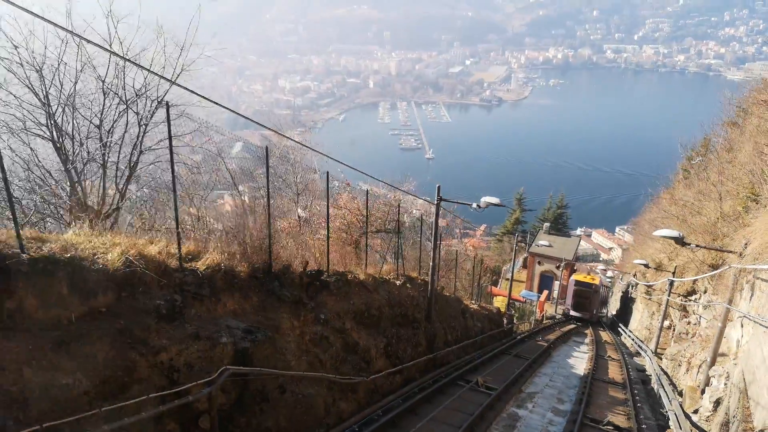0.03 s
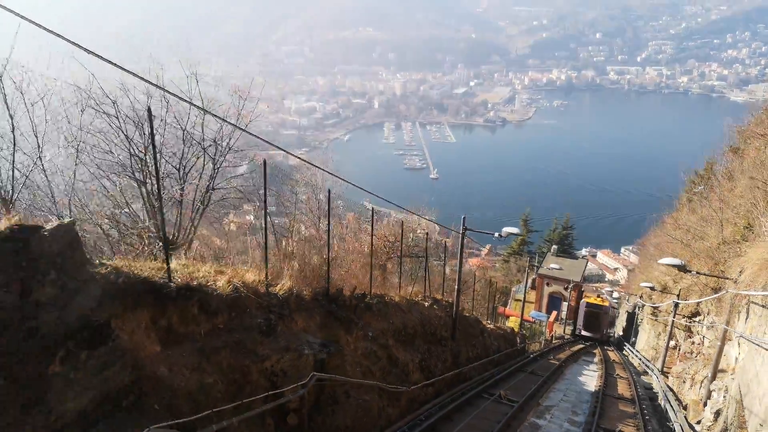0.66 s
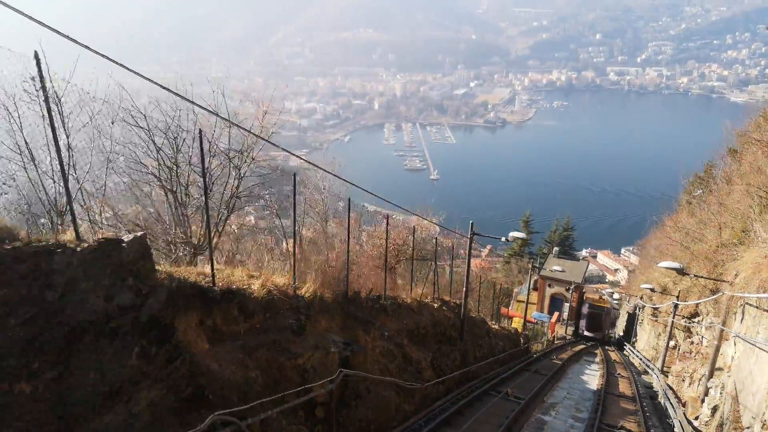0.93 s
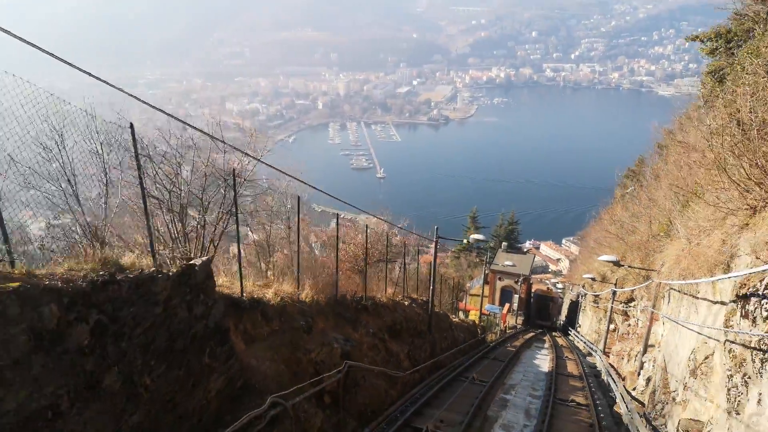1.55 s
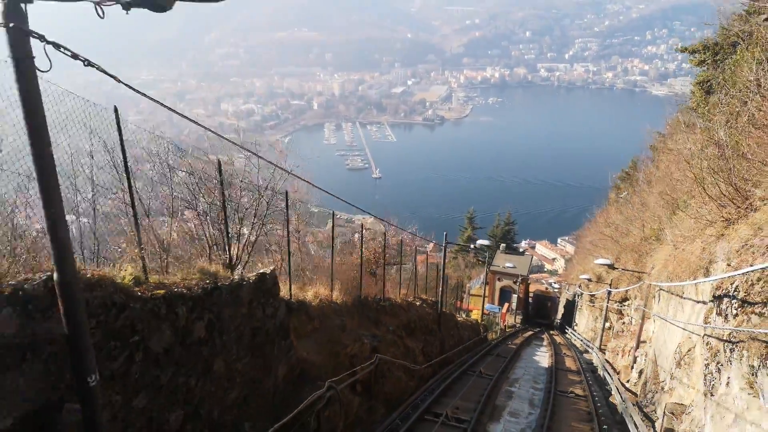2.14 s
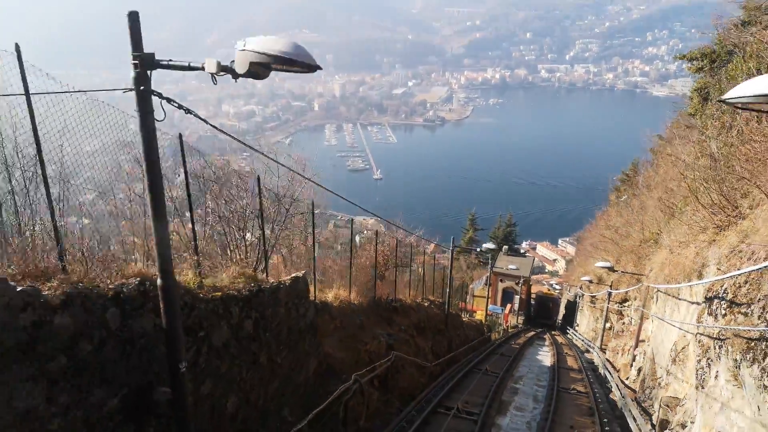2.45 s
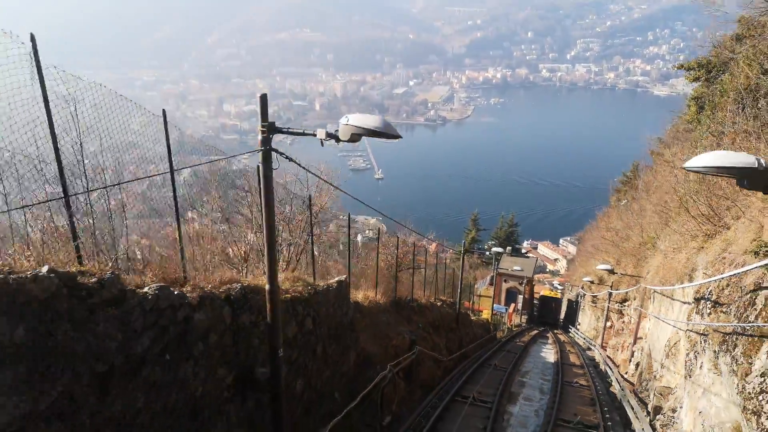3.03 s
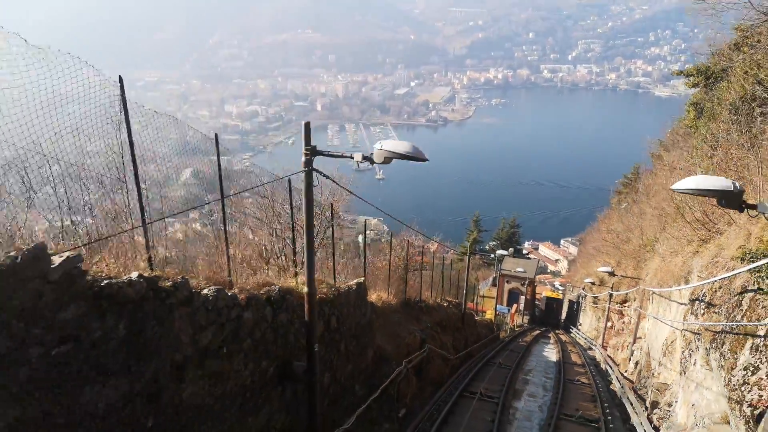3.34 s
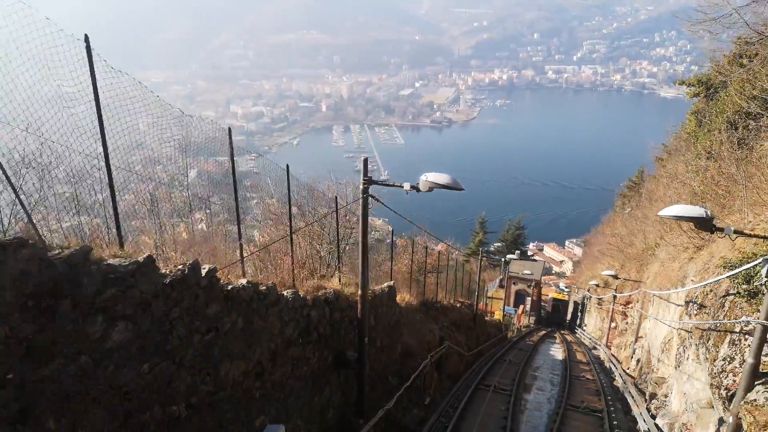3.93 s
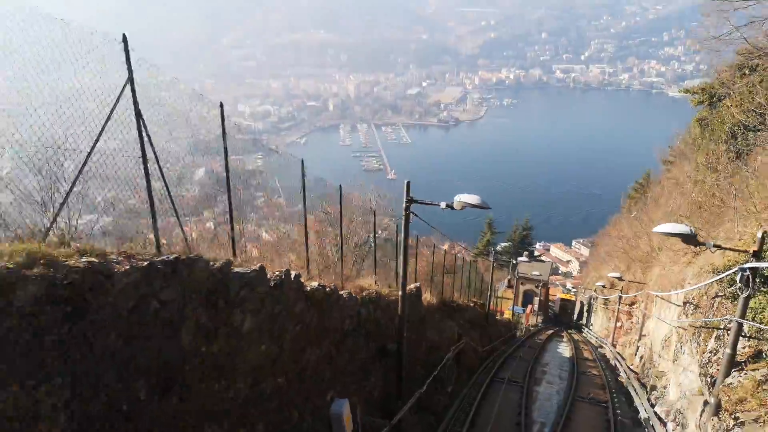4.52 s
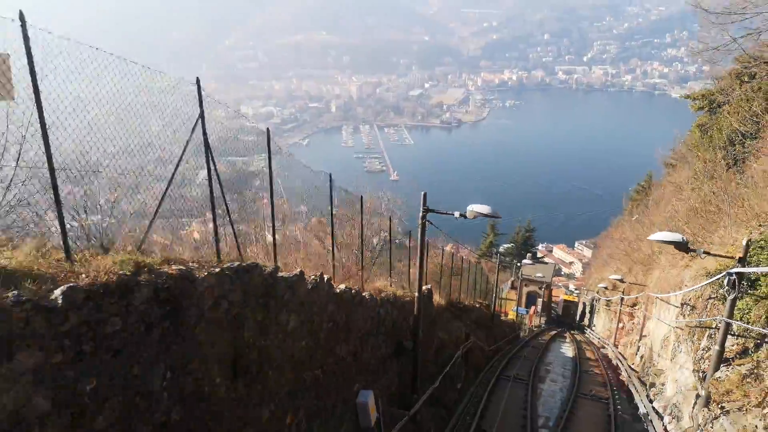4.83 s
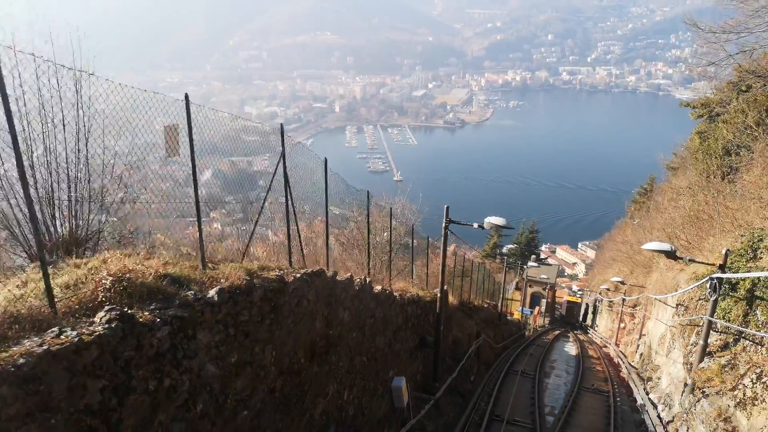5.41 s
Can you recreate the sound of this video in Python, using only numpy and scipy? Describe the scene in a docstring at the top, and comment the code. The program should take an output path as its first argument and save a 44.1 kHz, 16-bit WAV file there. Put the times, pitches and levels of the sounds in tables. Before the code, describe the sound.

A funicular car rolls along its track for about five and a half seconds, heard from its open end. A deep, pulsing cabin rumble dominates throughout, slightly to the left, over a dull wheel roar and faint gusts of hissing air. Soft knocks come at 0.3 seconds and cluster between 0.8 and 1, with a tiny tick at 0.5 and a brief spit and scrape around 0.7. Dull bumps jolt the cabin between 1.8 and 2.5 seconds, the heaviest at 2.3 with a muffled crunch. The rumble and gusts are strongest from about 2 to 4.7 seconds. A low wheel hum swells around 3.2, with a barely audible high air whistle. A knock and tick land at 3.6, another thump at 4.1, and light knocks from 4.8 to 5.3 as the rumble eases. A faint, thin rail squeal comes at 5.5.

```python
"""A funicular car climbs a steep track, heard from its open end.
From the start the rolling wheels keep the cabin booming in four low modes, over a dull roar and gusts
of hissing air. Soft knocks begin; a tick, a spit and a scrape pass in the first second. Then bumps jolt
the cabin, the heaviest with a dull crunch, air whistles faintly and a singing wheel swells, while a
limiter holds down the biggest booms. A thin rail squeal comes at the very end."""
import sys
import numpy as np
from scipy import signal
from scipy.fft import rfft, irfft, next_fast_len
from scipy.io import wavfile
from scipy.ndimage import uniform_filter1d, minimum_filter1d

SR = 44100
rng = np.random.default_rng(int(sys.argv[2]) if len(sys.argv) > 2 else 0)


def wav_out(sig):
    """Save sig, one row per channel (or a flat mono array), as 16-bit PCM at SR to the path in sys.argv[1]."""
    wavfile.write(sys.argv[1], SR, np.round(np.clip(np.atleast_2d(sig).T, -1, 1) * 32767).astype(np.int16))


N = 246078
T = np.arange(N) / SR


def from_db(db):
    """Decibels to gain."""
    return 10 ** (np.asarray(db) / 20)


def unit_rms(x):
    """Scale to unit power."""
    return x / np.sqrt(np.mean(np.abs(x) ** 2) + 1e-20)


def curves(rows):
    """Each column of a timed table, at every sample."""
    s, *columns = np.transpose(rows)
    return [np.interp(T, s, column) for column in columns]


def pan(left_db):
    """Left and right gains for a level difference."""
    return from_db(np.array([[left_db], [-left_db]]) / 2)


def drift(rate_hz):
    """A smooth random wander, mostly slower than rate_hz; rms 1."""
    size = next_fast_len(N // 20)
    hz = np.fft.rfftfreq(size, 20 / SR)
    slow = irfft(rfft(rng.standard_normal(size)) / (1 + (hz / rate_hz) ** 4), size)
    return unit_rms(np.interp(np.arange(N) / 20, np.arange(size), slow))


def coloured(spectrum):
    """Noise with the given spectrum, rippled by reflections from the cabin walls; rms 1."""
    size = next_fast_len(N)
    hz, db = np.transpose(spectrum)
    bins = np.maximum(np.fft.rfftfreq(size, 1 / SR), 1)
    skirts = np.minimum(bins / hz[0], 1) ** 2 * np.minimum(hz[-1] / bins, 1) ** 2
    gain = from_db(np.interp(np.log(bins), np.log(hz), db)) * skirts
    direct = irfft(rfft(rng.standard_normal(size)) * gain, size)[:N]
    lags = (rng.uniform(.004, .022, size=4) * SR).astype(int)
    return unit_rms(direct + from_db(-15) * sum(np.roll(direct, lag) for lag in lags))


def stereo(spectrum, side_db):
    """Coloured noise, partly different at the two ears."""
    return coloured(spectrum) + from_db(side_db) * coloured(spectrum) * np.array([[1], [-1]])


def phasor(hz):
    """A unit phasor that follows a pitch curve."""
    return np.exp(2j * np.pi * np.cumsum(hz) / SR)


def tone(hz, waver):
    """A sine whose pitch wanders by the fraction waver; rms 1."""
    return unit_rms(np.imag(phasor(hz * (1 + waver * drift(22)))))


def swell(s, length, steepness):
    """A smooth rise and fall around s, above half power for the given length; steepness 2 is a bell."""
    near, out = slice(*np.searchsorted(T, [s - 2 * length, s + 2 * length])), np.zeros(N)
    out[near] = 2 ** (-np.abs(2 * (T[near] - s) / length) ** steepness / 2)
    return out


def burst(s, rise, t60):
    """Envelope of one blow: a quick rise, then an exponential decay."""
    near = (T >= s) & (T < s + 2 * t60)
    age, out = T[near] - s, np.zeros(N)
    out[near] = (1 - np.exp(-age / rise)) * from_db(-60 * age / t60)
    return out


def ringing(modes):
    """Resonances kept ringing by random excitation; rms 1."""
    out = 0
    for hz, width, db in modes:
        radius = np.exp(-np.pi * width / SR)
        poles = [1, -2 * radius * np.cos(2 * np.pi * hz / SR), radius * radius]
        out = out + from_db(db) * unit_rms(signal.lfilter([1, 0, -1], poles, rng.standard_normal(N)))
    return unit_rms(out)


def struck(s, modes, rise):
    """One blow on a body: every mode rings down at its own rate, with a strength of its own."""
    near = (T >= s) & (T < s + 1 / 4)
    age, out = T[near] - s, np.zeros(N)
    for k, (hz, db, t60) in enumerate(modes):
        strength = (-1) ** k * from_db(db + rng.normal(0, 1))
        envelope = (1 - np.exp(-age / rise)) * from_db(-60 * age / t60)
        out[near] += strength * envelope * np.sin(2 * np.pi * hz * age)
    return out


# The cabin's low end. Each row: centre in Hz, width in Hz, level on an average ride in dB,
# dB gained per dB of shaking, judder in dB, lean to the left in dB.
BOOM_MODES = [(34.48, 6.4, -18.5, 0.03, 0, 1.7), (59.56, 3.85, -19, 1.2, -1.5, 2.2),
              (79.4, 9.3, -18, 0.22, -2, 1.3), (119.2, 4.73, -19, 0.68, -2, 2)]
# Pushes from the wheels. Each row: middle in seconds, length in seconds, pitch in Hz, level in dB.
SURGES = [(0.133, 0.066, 33.6, -13.5), (0.685, 0.061, 57.4, -12), (0.74, 0.082, 81.7, -11.5),
          (1.004, 0.083, 84.2, -12.5), (1.165, 0.18, 35.1, -12.5), (1.292, 0.67, 60.98, -16),
          (1.311, 0.037, 118.3, -14.5), (1.547, 0.11, 74.84, -11), (1.604, 0.082, 117.4, -10),
          (1.78, 0.06, 80.9, -9), (1.866, 0.088, 109.6, -12.5), (2.038, 0.2, 80.02, -7.5),
          (2.084, .24, 56.83, -10), (2.214, 0.2, 33.14, -17), (2.33, 0.069, 115.9, -12.5),
          (2.411, 0.26, 83.1, -8.5), (2.46, 0.2, 58.59, -21), (2.514, 0.21, 119.9, -15),
          (2.707, 0.064, 123.8, -5), (2.71, 0.078, 78.05, -5), (2.895, 0.061, 82.33, -8.5),
          (3.046, 0.17, 57.23, -8), (3.223, 0.225, 106.3, -10), (3.426, .17, 57.04, -8.5),
          (3.558, 0.1534, 76.76, -5.5), (4.149, 0.22, 122.2, -6), (4.003, 0.071, 75.03, -11),
          (4.272, 0.21, 76.74, -10), (4.34, 0.036, 122.2, -13), (4.42, 0.17, 56.96, -12.5),
          (4.595, 0.15, 58.8, -11), (4.613, 0.05, 117.4, -13.5), (4.869, .15, 73.3, -16),
          (5.066, 0.042, 118.4, -12.5), (5.297, .1, 78.3, -15.5)]


def surging(hz, db):
    """Pitch and level of a cabin mode: each surge near it lifts its level and pulls its pitch."""
    centres = np.array(BOOM_MODES)[:, 0]
    power = from_db(db) ** 2
    pull = power * hz
    for s, length, surge_hz, surge_db in SURGES:
        if np.argmin(np.abs(centres - surge_hz)) == np.argmin(np.abs(centres - hz)):
            push = (from_db(surge_db) * swell(s, length, steepness=2.81)) ** 2
            power, pull = power + push, pull + push * surge_hz
    return pull / power, 10 * np.log10(power)


def boom(hz, db, width_hz, judder_db):
    """A cabin mode driven at random by the wheels: a ring of wandering phase, roughened by judder."""
    ring = drift(width_hz) + 1j * drift(width_hz)
    ring = ring / np.sqrt(np.abs(ring) ** 2 + 0.45)
    judder = drift(12.7) + 1j * drift(12.3)
    judder = judder / np.sqrt(uniform_filter1d(np.abs(judder) ** 2, SR // 6))
    share = from_db(judder_db - 0.85 * (db - db.mean()))   # the stronger the boom, the purer it is
    shake = (ring + share * judder) / np.sqrt(1 + share ** 2)
    return from_db(db) * unit_rms(np.real(shake * phasor(hz)))


# How hard the track shakes the car. Each row: time in seconds, drone fader in dB, roar fader in dB.
RIDE = [(0.03, -43.5, -44.5), (0.07, -34, -46.5), (0.75, -32, -45.5), (0.87, -25.5, -47),
        (0.89, -25.5, -46), (1.18, -34.5, -45.5), (1.23, -27.5, -43), (3.34, -26, -39), (3.81, -27.5, -46),
        (3.97, -33.5, -45), (4.07, -24, -40.5), (4.24, -24, -35.5), (4.54, -28, -41), (4.82, -29, -39.5),
        (4.96, -34.5, -45.5), (5.32, -31, -47), (5.35, -38, -48.5), (5.54, -29.5, -46.5)]
# Brief dips in the booming. Each row: middle in seconds, length in seconds, gain in dB.
LULLS = [(1.716, 0.08, -2.5), (2.25, 0.031, -3.5), (2.768, .04, -3), (3.882, 0.13, -2),
         (5.195, 0.044, -5.5)]


def cabin_booms():
    """Four low modes ride the shaking of the car, surge and briefly dip."""
    drone_db = curves(RIDE)[0]
    shaking_db = drone_db - drone_db.mean()
    booms = sum(boom(*surging(hz, db + follows * shaking_db), width_hz, judder_db) * pan(left_db)
                for hz, width_hz, db, follows, judder_db, left_db in BOOM_MODES)
    lull_db = sum(db * swell(s, length, steepness=2.5) for s, length, db in LULLS)
    return from_db(lull_db) * booms


# The drone's low-mid colour. Each row: frequency in Hz, relative level in dB.
PANEL_COLOUR = [(125, -44), (148, 9), (170, 8.5), (200, 3), (222, 5), (240, -6.5), (290, -4), (320, -19.5),
                (420, -16.5), (700, -81)]


def panel_drone():
    """The wall panels drone as the track shakes them."""
    drone_db = curves(RIDE)[0]
    return from_db(drone_db + 0.9) * stereo(PANEL_COLOUR, side_db=-12) * pan(4.3)


def singing_wheel():
    """A wheel sings throughout and swells for a while."""
    level_db = -41.5 + 8.5 * swell(s=3.24, length=.8, steepness=3.1)
    return from_db(level_db) * tone(hz=225.3, waver=0.0249) * pan(4.3)


# The roar's dark colour. Each row: frequency in Hz, relative level in dB.
ROAR_COLOUR = [(200, -12), (320, 3.5), (420, -4), (560, -4.5), (800, -7), (1050, -15), (1400, -18.5),
               (1800, -21.5), (3500, -48)]
# The ring of the rails. Each row: pitch in Hz, width in Hz, relative level in dB.
RAIL_MODES = [(1192, 21, -8), (1386, 140, 0), (2370, 25, -13.5), (3170, 47, -7), (3600, 50, -7.5),
              (4330, 49.6, -14)]


def wheel_roar():
    """Steel rolling on uneven rail: a dull roar that flutters and a faint metallic ring."""
    roar_db = curves(RIDE)[1]
    flutter_db = 0.55 * drift(17)
    roar = from_db(roar_db - 0.25 + flutter_db) * stereo(ROAR_COLOUR, side_db=-3.5) * pan(0.32)
    ring = from_db(roar_db - 10.5) * np.array([ringing(RAIL_MODES), ringing(RAIL_MODES)])
    return roar + ring


# The bed of air. Each row: time in seconds, rush fader in dB, hiss fader in dB.
AIR_BED = [(0, -55.5, -52), (0.58, -58, -56), (0.9, -53, -48), (1.65, -50.5, -50), (3.6, -53.5, -45.5),
           (3.87, -55.5, -53), (4.45, -53.5, -46), (5.22, -65.5, -57), (5.55, -53, -50)]
# Gusts on top. Each row: middle in seconds, length in seconds, rush in dB, hiss in dB.
GUSTS = [(0.407, 0.092, -59, -55.5), (0.69, 0.058, -54, -44.5), (0.77, 0.044, -59, -46),
         (1.153, 0.08, -53, -45), (1.381, 0.088, -49, -49.5), (1.963, .13, -69, -49.5),
         (2.137, 0.061, -52, -45), (2.527, 0.22, -47, -40.5), (2.708, 0.14, -44.5, -42.5),
         (3.123, 0.084, -58, -41.5), (3.274, 0.16, -46, -45.5), (3.479, 0.093, -49.5, -38),
         (3.582, 0.09, -48, -42.5), (4.229, 0.13, -43.5, -40.5), (4.359, 0.1, -54, -42.5),
         (4.549, 0.064, -55, -39.5), (4.65, 0.059, -48.5, -39.5), (4.77, 0.12, -51.5, -43),
         (5.128, 0.072, -56, -52.5), (5.321, 0.049, -73, -55)]
# Colours of the midrange rush and each side's hiss. Each row: frequency in Hz, relative level in dB.
RUSH_COLOUR = [(500, -7), (1100, 7.5), (1500, 1), (1900, 0.5), (2500, 1.5), (3200, -4), (4200, -13.5),
               (5500, -5.5), (9000, -16)]
HISS_LEFT = [(2500, -14.5), (4500, -13.5), (5800, -12.5), (7400, -10.5), (8500, -6.5), (9450, -2),
             (10600, -10.5), (12200, -16.5), (14300, -21.5)]
HISS_RIGHT = [(2500, -31), (4200, -8), (4800, -22), (6000, -14), (7600, -11.5), (8750, -5), (9900, -15),
              (11500, -24.5), (14300, -28)]


def airflow():
    """Gusts rush past; each microphone port colours the hiss with its own resonance."""
    rush_power, hiss_power = from_db(curves(AIR_BED)) ** 2
    for s, length, rush_db, hiss_db in GUSTS:
        gust = swell(s, length, steepness=1.87) ** 2
        rush_power = rush_power + gust * from_db(rush_db) ** 2
        hiss_power = hiss_power + gust * from_db(hiss_db) ** 2
    eddies = from_db(0.93 * drift(14.5))
    rush = np.sqrt(rush_power) * from_db(1.2) * stereo(RUSH_COLOUR, side_db=0.6)
    ports = np.array([coloured(HISS_LEFT), coloured(HISS_RIGHT)])
    hiss = np.sqrt(hiss_power) * from_db(0.67) * ports * pan(4.6)
    return eddies * (rush + hiss)


# Knocks, and the dull crunch on the heaviest thumps.
# Each row: start in seconds, level in dB, brightness in dB.
KNOCKS = [(0.305, -36, -3.5), (0.756, -33, -4), (0.814, -40.5, -4), (0.89, -29.5, -2.5), (0.955, -35, -15),
          (1.004, -34, -7.5), (1.77, -36, -18), (1.96, -38, -6), (2.314, -30.5, -10), (2.53, -35, -24),
          (3.557, -31.5, -3.5), (4.119, -36, -23), (4.226, -29.5, -12), (4.828, -33.5, 4.5),
          (5.101, -31.5, 1), (5.298, -37.5, -6)]
# The clack of the attack. Each row: pitch in Hz, relative level in dB, seconds to fall 60 dB.
CLACK_MODES = [(636, -9.5, 0.11), (867, 2.5, 0.07), (1066, -6, 0.044), (1294, -16, 0.027),
               (1620, -27, 0.02), (2300, -9, .025)]
# The chassis ring. Each row: pitch in Hz, width in Hz, relative level in dB.
CHASSIS_MODES = [(416, 32, -25), (592, 36, 8), (825, 48, 11), (1110, 81, -1)]
# Colours of the bright crack and the dull body. Each row: frequency in Hz, relative level in dB.
CRACK_COLOUR = [(400, 16.5), (750, 6.5), (1150, 5), (1600, -14), (2600, -27), (5000, -24), (12000, -24)]
BODY_COLOUR = [(120, -14), (260, 17.5), (480, 6.5), (700, 1), (1000, -25), (2500, -24.5)]


def knocks_and_crunches():
    """Each opens with a clack and bounces once; the chassis rings on, the dull body swells last."""
    bounces = [(s + 0.029, db - 8.5, bright_db - 1.5) for s, db, bright_db in KNOCKS]   # softer, duller
    clack = crack = ring = body = 0
    for s, db, bright_db in KNOCKS + bounces:
        bright = from_db(db + bright_db)
        clack += bright * from_db(-5) * struck(s, CLACK_MODES, rise=.0005)
        crack += bright * burst(s, rise=.0006, t60=.05)
        ring += bright * burst(s, rise=.004, t60=.28)
        body += from_db(db) * burst(s, rise=0.008, t60=0.21)
    chassis = ringing(CHASSIS_MODES) + from_db(-2) * ringing(CHASSIS_MODES) * np.array([[1], [-1]])
    hit = clack + from_db(7.5) * crack * stereo(CRACK_COLOUR, side_db=-2.5)
    tail = from_db(-9.5) * ring * chassis + from_db(5.5) * body * stereo(BODY_COLOUR, side_db=-4.5)
    rattle = from_db(1.3 * drift(54))
    return hit + rattle * tail


# Sharp little ticks. Each row: start in seconds, level in dB, lean to the left in dB.
TICKS = [(0.491, -34.5, 13), (3.640, -35, 17), (3.945, -39, 8)]
# First the spit, then the scrape. Each row: start in seconds, level in dB.
SPIT_AND_SCRAPE = [(0.657, -39), (0.743, -43.5)]
# Colours of the ticks and spit, and of the scrape. Each row: frequency in Hz, relative level in dB.
TICK_COLOUR = [(2500, -30), (6800, -28), (8800, -6), (10500, -12), (12500, -19), (14500, -20)]
SCRAPE_COLOUR = [(2800, -15), (4200, -3), (6500, -5), (9000, -2), (12000, -13)]


def ticks_and_scrape():
    """Bursts of bright noise, mostly on the left: tiny ticks, a spit of hiss and a short scrape."""
    ticks = sum(from_db(db) * burst(s, rise=0.00027, t60=0.019) * pan(left_db)
                for s, db, left_db in TICKS)
    (spit_s, spit_db), (scrape_s, scrape_db) = SPIT_AND_SCRAPE
    spit = from_db(spit_db) * burst(spit_s, rise=0.0092, t60=0.21) * pan(7.3)
    scrape = from_db(scrape_db) * burst(scrape_s, rise=0.0051, t60=0.18) * pan(4)
    return (ticks + spit) * stereo(TICK_COLOUR, side_db=-9) + scrape * stereo(SCRAPE_COLOUR, side_db=1)


# Thumps through the whole cabin. Each row: start in seconds, level in dB.
JOLTS = [(0.897, -42), (1.771, -24), (1.958, -14.5), (2.316, -6), (2.337, -9), (2.529, -13), (4.114, -12)]
# Their ring. Each row: pitch in Hz, relative level in dB, seconds to fall 60 dB.
JOLT_MODES = [(117.77, -15, 0.096), (172.4, -18, 0.057), (301, 2, 0.032), (463, -15, 0.064),
              (600, -25, 0.017)]


def jolts():
    """Bumps in the track set the cabin ringing."""
    return sum(from_db(db) * struck(s, JOLT_MODES, rise=0.0042) for s, db in JOLTS) * pan(3.3)


# Faint, very high whistles. Each row: middle in seconds, length in seconds, level in dB.
WHISTLES = [(2.018, 0.18, -73), (3.298, 0.46, -64)]
# Their two notes. Each row: pitch in Hz, width in Hz, relative level in dB.
WHISTLE_MODES = [(13072, 25, 0), (13626, 17, -1)]


def air_whistles():
    """Air whistles at an edge."""
    envelope = sum(from_db(db) * swell(s, length, steepness=2) for s, length, db in WHISTLES)
    return envelope * ringing(WHISTLE_MODES) * pan(7)


# The closing squeal. Each row: time in seconds, pitch in Hz, level in dB.
SQUEAL = [(5.45, 8900, -65), (5.5, 8940, -63), (5.54, 8705, -56), (5.58, 8940, -57)]


def rail_squeal():
    """The rail squeals in one thin, slightly unsteady line."""
    hz, db = curves(SQUEAL)
    sounding = (T > SQUEAL[0][0]) & (T <= SQUEAL[-1][0])
    return sounding * from_db(db) * tone(hz, waver=0.0047) * pan(2.95)


def scene():
    """Everything heard from the car."""
    cabin = cabin_booms() + panel_drone() + singing_wheel() + jolts()
    rails = wheel_roar() + rail_squeal()
    return cabin + rails + knocks_and_crunches() + airflow() + air_whistles() + ticks_and_scrape()


def record(dry):
    """A quick limiter ducks the heaviest booms; crests are rounded, the ends eased and the top cut."""
    ceiling, knee, hold_samples = 1.15, 14, SR // 40
    fade_s, cutoff_hz = .004, 14300
    allowed = ceiling / np.maximum(np.abs(dry).max(axis=0), ceiling)
    limited = dry * uniform_filter1d(minimum_filter1d(allowed, hold_samples), hold_samples)
    rounded = limited / (1 + np.abs(limited) ** knee) ** (1 / knee)
    from_edge_s = np.minimum(T, T[-1] - T)
    fade = np.sin(np.pi / 2 * np.minimum(from_edge_s / fade_s, 1)) ** 2
    lowpass = signal.ellip(12, .1, 70, cutoff_hz, fs=SR, output="sos")
    return signal.sosfilt(lowpass, fade * rounded)


dry = scene()
out = record(dry)
wav_out(out)
```